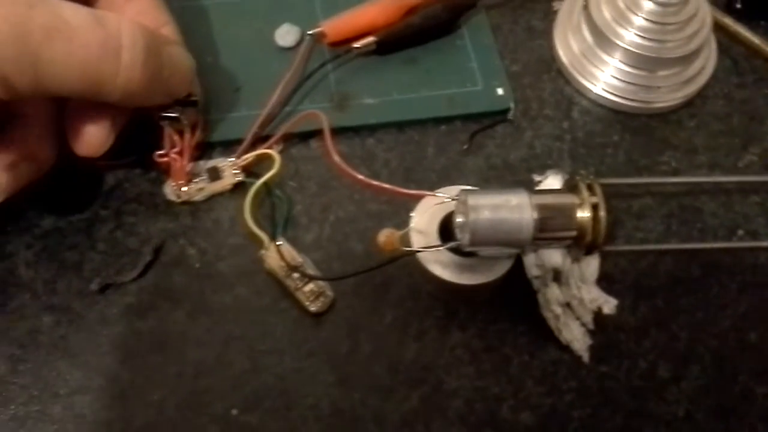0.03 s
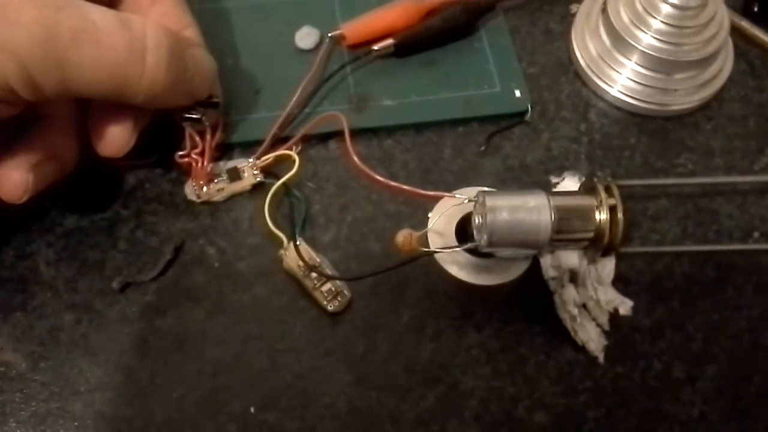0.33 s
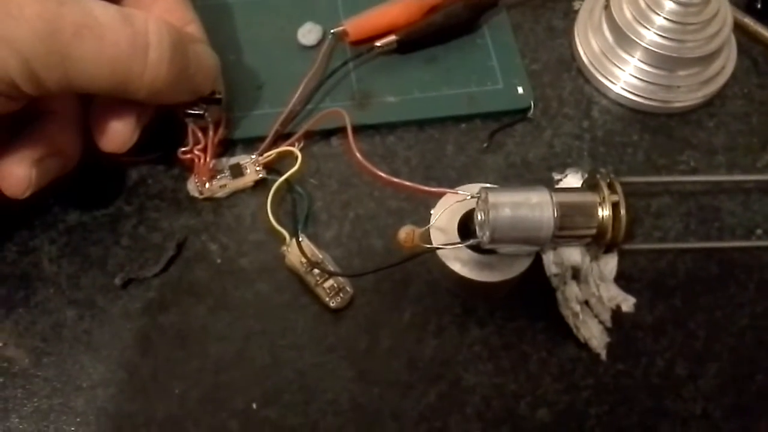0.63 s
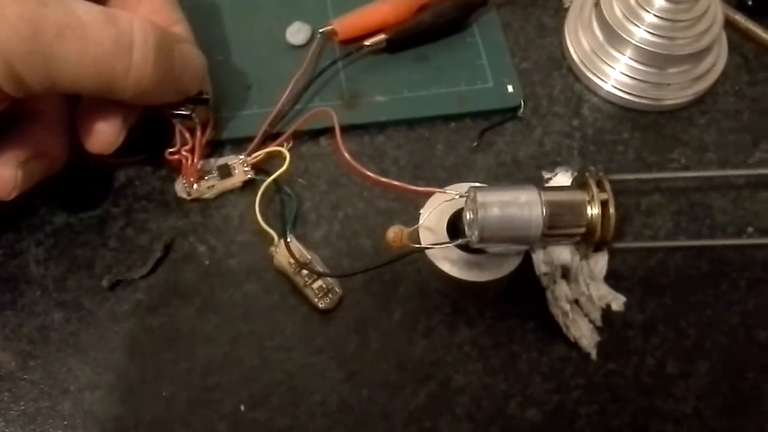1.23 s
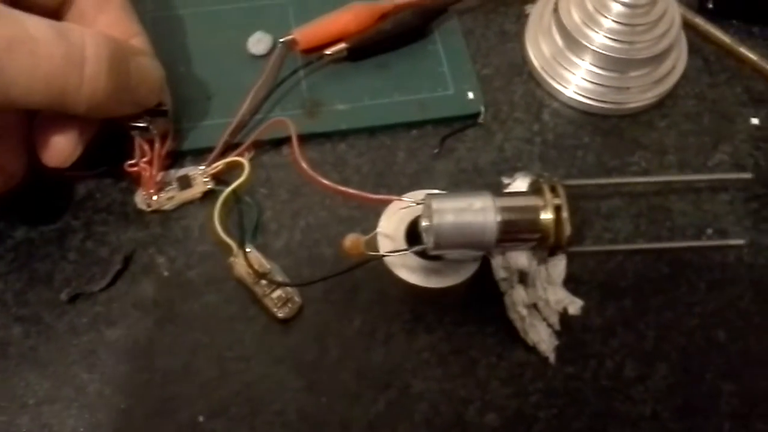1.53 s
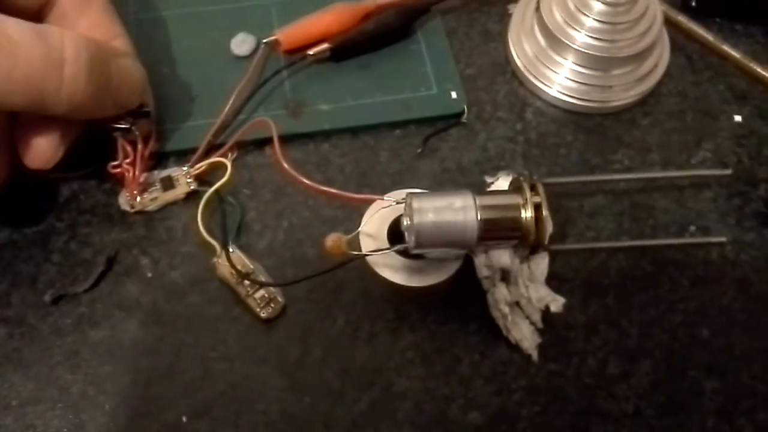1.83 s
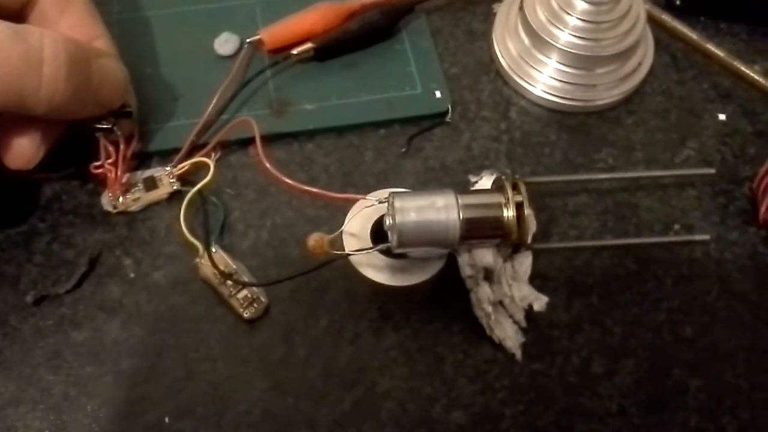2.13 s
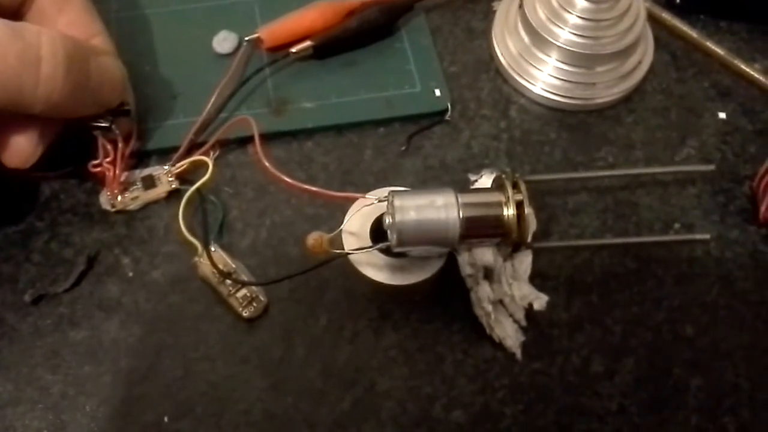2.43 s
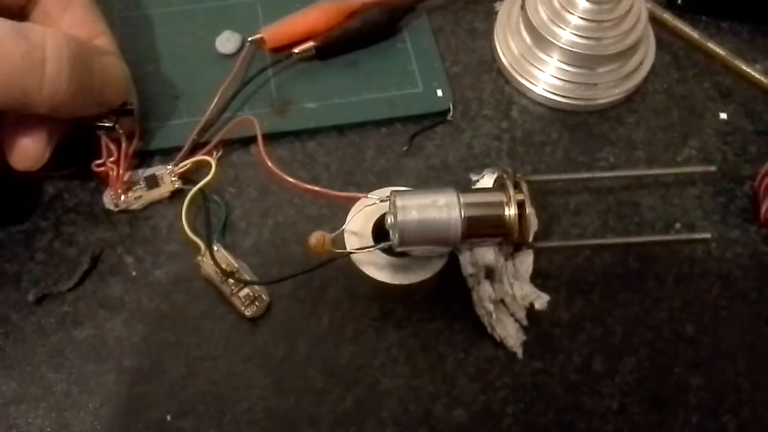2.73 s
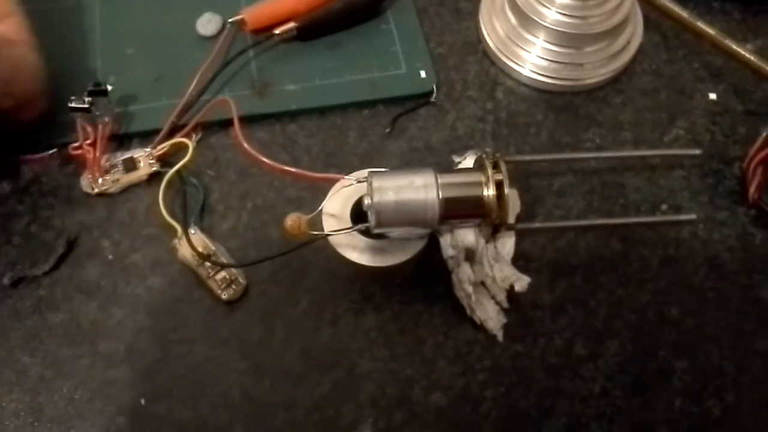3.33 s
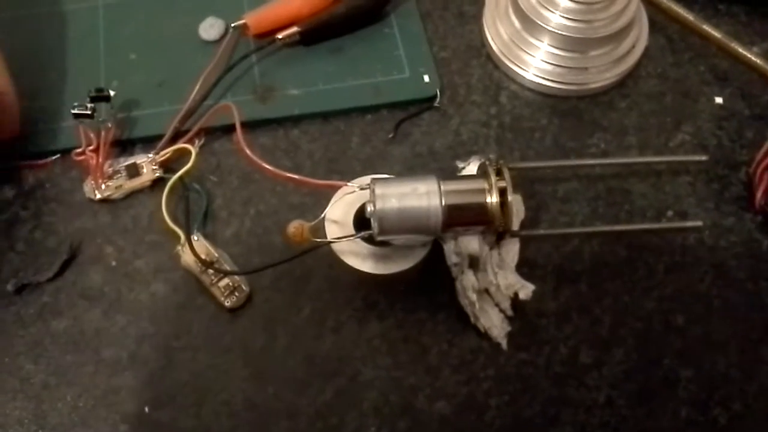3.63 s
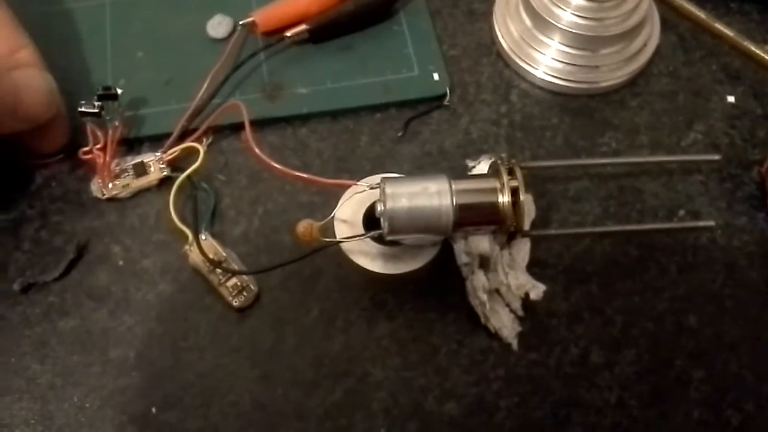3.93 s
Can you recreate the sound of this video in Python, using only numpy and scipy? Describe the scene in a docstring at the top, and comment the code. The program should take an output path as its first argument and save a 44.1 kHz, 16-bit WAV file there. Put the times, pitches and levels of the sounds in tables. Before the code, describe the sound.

Harsh, steady buzz of a little electric motor that suddenly cuts off into quiet hum.

```python
"""On a workbench, a small brushed DC motor buzzes at about 96 turns a second, its speed wavering.
The rotor radiates harmonics of its rotation rate; the brushes tick and scrape round the commutator
and drive the casing's resonances. Bench and room add short reflections. When the power is cut the shaft
brakes within a few hundredths of a second and the casing clatters, leaving a low hum and a fading hiss."""
import sys
import numpy as np
from scipy import signal
from scipy.fft import rfft, irfft, next_fast_len
from scipy.io import wavfile

SR = 44100
rng = np.random.default_rng(int(sys.argv[2]) if len(sys.argv) > 2 else 0)


def generate_wav(signal):
    """Clip the signal to [-1, 1] and save it as 16-bit WAV at the path in sys.argv[1]."""
    frames = np.transpose(np.atleast_2d(signal))
    scaled = np.clip(frames, -1, 1) * 32767
    pcm = np.round(scaled).astype(np.int16)
    wavfile.write(sys.argv[1], SR, pcm)


N = 176400
TIME = np.arange(N) / SR
POWER_OFF_S, BRAKE_S = 2.921, .075


def from_db(db):
    """Amplitude ratio of a level in decibels."""
    return 10 ** (np.asarray(db) / 20)


def envelope(rows):
    """Amplitude envelope, linear in decibels between (time [s], level [dB]) points."""
    return from_db(np.interp(TIME, *np.transpose(rows)))


def drift(corner_hz):
    """Slow random modulation: low-passed Gaussian noise of unit variance."""
    hop = 40
    pole = np.exp(-2 * np.pi * corner_hz * hop / SR)
    slow = signal.lfilter([1], [1, -2 * pole, pole * pole], rng.standard_normal(N // hop + 2002))[2000:]
    return np.interp(np.arange(N) / hop, np.arange(len(slow)), slow / slow.std())


def white():
    """White noise with a spectral density of 0 dB/Hz."""
    return rng.standard_normal(N) * np.sqrt(SR / 2)


def colour(x, points):
    """Zero-phase filtering by a curve of (frequency [Hz], gain [dB]) points."""
    hz, db = np.transpose(points)
    size = next_fast_len(N + SR)
    bin_hz = np.maximum(np.arange(size // 2 + 1) * SR / size, 1)
    gain = from_db(np.interp(np.log(bin_hz), np.log(hz), db))
    return irfft(rfft(x, size) * gain, size)[:N]


def resonance(x, hz, width_hz):
    """Forced response of one damped mode, with unit gain at its peak."""
    r = np.exp(-np.pi * width_hz / SR)
    feedback = [1, -2 * r * np.cos(2 * np.pi * hz / SR), r * r]
    return signal.lfilter(np.array([1, 0, -1]) * (1 - r * r) / 2, feedback, x)


# Spectrum of the room hiss: (frequency [Hz], gain [dB])
HISS_SPECTRUM = [(20, -88), (45, -110), (90, -83.5), (160, -83), (300, -86.5), (600, -92.5), (1000, -96),
                 (1600, -100), (2600, -104), (3600, -103), (4500, -100.5), (5500, -104), (9000, -105),
                 (14500, -104)]
# Envelope of the hiss: (time [s], level [dB])
HISS_ENVELOPE = [(0, -8.5), (2.9, -6), (2.99, 2.5), (3.1, -2.5), (3.3, -4), (3.5, -8.5), (3.8, -14),
                 (4, -16)]
# Envelope of the hum: (time [s], level [dB])
HUM_ENVELOPE = [(0, -79), (.6, -85), (1.1, -79), (2.92, -78), (3.02, -64.5), (3.5, -67), (4, -69.5)]


def background(hum_hz=64.4, waver=.13):
    """Broadband hiss and a hum modulated in phase and amplitude, both strongest as the motor stops."""
    phase = 2 * np.pi * hum_hz * TIME + waver * drift(3.5)
    hum = np.sqrt(2) * np.sin(phase) * (1 + waver * drift(2.4))
    hiss = colour(white(), HISS_SPECTRUM)
    return hiss * envelope(HISS_ENVELOPE) + hum * envelope(HUM_ENVELOPE)


def bench_reflections(x, gain_db=-14.5, t60_s=.15, delay_s=.003):
    """Reverberation: diffuse reflections from bench and room decay exponentially."""
    t = TIME[:SR // 2]
    response = rng.standard_normal(len(t)) * from_db(-60 * t / t60_s) * (t > delay_s)
    return from_db(gain_db) * signal.fftconvolve(x, response / np.linalg.norm(response))[:N]


# Bursts in the casing: (time [s], frequency [Hz], bandwidth [Hz], peak density [dB/Hz])
CLATTER_BURSTS = [(2.931, 1560, 420, -77), (2.942, 980, 180, -70.5), (2.935, 3900, 510, -89)]


def clatter(half_length_s=.018):
    """Transient excitation: noise bursts ring the casing's resonances as the shaft slows."""
    return sum(from_db(db) * resonance(white() * np.exp(-((TIME - s) / half_length_s) ** 2), hz, width)
               for s, hz, width, db in CLATTER_BURSTS)


# Modes of the casing: (frequency [Hz], bandwidth [Hz], gain [dB])
CASING_MODES = [(946, 49, 8), (1715, 47, 10.5), (2600, 36, 4), (5360, 100, 4.5), (8100, 340, 5.5)]


def casing(force):
    """Resonance: the casing reinforces the brush force near its natural frequencies."""
    return force + sum((from_db(db) - 1) * resonance(force, hz, width) for hz, width, db in CASING_MODES)


# Spectral weighting of the ticks: (frequency [Hz], gain [dB])
TICK_SPECTRUM = [(100, -18), (400, -16), (1000, -12), (2500, -12), (4300, -3), (8000, 0.5), (14000, -2)]


def ticks(turns, per_turn=48, spread_db=1.5, jitter_s=8e-6, flicker=.3):
    """Quasi-periodic impacts: the brushes meet the same rough spots each turn, never quite alike."""
    spots = rng.random(per_turn)
    strength = from_db(spread_db * rng.standard_normal(per_turn)) * rng.choice([-1, 1], per_turn)
    chance = rng.standard_normal((int(turns[-1]), per_turn, 2))
    hit_turns = np.arange(len(chance))[:, None] + spots
    hit_s = np.interp(hit_turns, turns, TIME) + jitter_s * chance[..., 0]
    sizes = strength * (1 + flicker * chance[..., 1])
    # Fourfold oversampling lets impacts fall between samples.
    slots = np.clip(hit_s * SR * 4, 0, 4 * N - 1).astype(int)
    impacts = signal.resample_poly(np.bincount(slots.ravel(), sizes.ravel(), 4 * N), 1, 4)
    impacts *= np.sqrt(SR / 2) / impacts[TIME < POWER_OFF_S].std()   # same power as white()
    return colour(impacts, TICK_SPECTRUM)


# Spectral weighting of the scrape: (frequency [Hz], gain [dB])
SCRAPE_SPECTRUM = [(100, 0), (500, 0), (1500, -0.5), (4000, -1.5), (8000, -0.5), (14000, -0.5)]


def scrape(turns, depth=.39, per_turn=4):
    """Sliding friction: noise, amplitude-modulated by the rotation."""
    pulsing = 1 + depth * np.cos(2 * np.pi * per_turn * turns)
    return colour(white() * pulsing, SCRAPE_SPECTRUM)


# Envelope of the brush force: (time [s], level [dB])
BRUSH_ENVELOPE = [(0, -0.5), (.6, -0.5), (1.0, -0.5), (1.3, 1), (1.7, 1.1), (2.1, -0.5), (2.6, 2.5),
                  (2.95, 1.5)]
# Weighting common to ticks and scrape: (frequency [Hz], gain [dB])
BRUSH_SPECTRUM = [(40, -101), (100, -99), (200, -87), (400, -86), (750, -86.5), (1100, -84), (1500, -83.5),
                  (1950, -90.5), (2500, -90.5), (3100, -94), (4200, -89.5), (5200, -94), (6400, -97),
                  (7400, -98.5), (8600, -98.5), (9800, -101), (10800, -94.5), (12300, -103), (13600, -99),
                  (14500, -102)]


def brushes(turns, speed_share):
    """Contact force: friction plus impacts, weakening as a power of the speed during braking."""
    force = (scrape(turns) + ticks(turns)) * envelope(BRUSH_ENVELOPE)
    return colour(force * speed_share ** .69, BRUSH_SPECTRUM)


# Harmonics that add in phase to four alternating jolts a turn: (order [cycles/turn])
JOLT_ORDERS = (6, 10, 14, 18, 22)


def harmonic(turns, order, waver, waver_hz=15.2):
    """A shaft harmonic of unit RMS, with random modulation in phase and in quadrature."""
    offset = rng.random() * (order not in JOLT_ORDERS)
    angle = 2 * np.pi * (order * turns + offset)
    wave = (1 + waver * drift(waver_hz)) * np.cos(angle) + waver * drift(waver_hz) * np.sin(angle)
    return wave * np.sqrt(2 / (1 + 2 * waver ** 2))


def rotor_tone(turns, speed, order, db, slope, racing_hz=96.3):
    """A harmonic whose level follows any speed above racing_hz; weak ones are modulated most deeply."""
    excess_hz = np.maximum(speed - racing_hz, 0)
    waver = min(from_db((-65 - db) / 2) / 2, .55)
    return from_db(db + slope * excess_hz) * harmonic(turns, order, waver)


def squeak(turns, speed, critical_hz=95.1, width_hz=.5):
    """Critical speed: one harmonic meets a casing mode when the shaft drags."""
    nearness = np.exp(-((speed - critical_hz) / width_hz) ** 2)
    return nearness * rotor_tone(turns, speed, order=40, db=-57.5, slope=0)


# Swells of the tenth harmonic: (centre time [s], duration [s], level [dB])
CHUG_SWELLS = [(0.102, .12, -45.5), (0.299, .06, -46.5), (0.393, .05, -47), (0.521, .07, -46.5),
               (0.707, 0.063, -47.5), (.80, .05, -48.5), (0.938, 0.046, -48.5), (1.11, 0.15, -48.5),
               (1.268, 0.098, -46), (1.37, 0.073, -43.5), (1.594, 0.081, -47), (1.776, 0.058, -47.5),
               (2.02, 0.054, -49), (2.17, 0.073, -49), (2.31, .04, -48), (2.394, .04, -49),
               (2.617, 0.064, -47.5)]


def chug(turns, floor_db=-53):
    """Amplitude modulation: the harmonic near 960 Hz swells about six times a second."""
    amplitude = from_db(floor_db)
    for centre_s, length_s, db in CHUG_SWELLS:
        swell = np.exp(-(2 * (TIME - centre_s) / length_s) ** 4 / 2)
        amplitude = np.maximum(amplitude, from_db(db) * swell)
    return amplitude * harmonic(turns, order=10, waver=.31)


# Partials of the whine, lowest first: (level [dB], slope with excess speed [dB/Hz])
WHINE_PARTIALS = [(-46.5, -10), (-56, -8), (-65.5, 0), (-70, -5)]
# Envelope of the whine: (time [s], level [dB])
WHINE_ENVELOPE = [(0.0, -1.3), (0.26, 0.1), (0.53, -1), (0.79, -0.7), (1.05, 1.2), (1.32, 1.4), (1.58, 1),
                  (1.85, -0.5), (2.11, 1), (2.37, 0), (2.64, -3), (2.9, -0.2)]


def whine(turns, speed, order=28):
    """A harmonic series on one high shaft order, dropping away when the shaft races."""
    partials = sum(rotor_tone(turns, speed, order * k, db, slope)
                   for k, (db, slope) in enumerate(WHINE_PARTIALS, 1))
    return partials * envelope(WHINE_ENVELOPE)


# Rotor harmonics: (order [cycles/turn], level [dB], slope with excess speed [dB/Hz])
BUZZ_HARMONICS = [(4, -68.8, 0), (5, -69.9, 0), (6, -49.2, 0), (7, -72.0, 0), (8, -69.0, 0),
                  (9, -65.3, -10), (11, -66.0, 0), (12, -62.3, 5), (13, -65.7, 8), (14, -58.2, 8),
                  (15, -58.9, 4), (17, -66.5, -6), (18, -46.0, -6), (20, -64.8, 6), (22, -61.1, 7),
                  (24, -63.4, -10), (26, -71.3, -1), (30, -59.5, -12), (34, -71.8, 4), (36, -70.5, 6),
                  (37, -74.0, 0), (38, -69.3, -12), (39, -74.0, 0), (40, -70.9, 8), (42, -64.9, 3),
                  (43, -67.2, -6), (44, -67.8, -10), (46, -61.5, -4), (47, -72.0, 0), (48, -72.7, 7),
                  (50, -67.6, 7), (54, -76.0, 0), (58, -77.4, 8), (62, -69.0, -8), (72, -70.2, -12),
                  (86, -72.3, 8)]
# Envelope of the buzz: (time [s], level [dB])
BUZZ_ENVELOPE = [(0.0, -0.5), (0.26, -1), (0.53, -1), (0.79, -0.2), (1.05, 2), (1.32, 3.0), (1.58, 0.4),
                 (1.85, 0), (2.11, -0.5), (2.37, 0.3), (2.64, 1), (2.9, -0.5)]


def rotor(turns, speed, fade_db_per_s=900):
    """Periodic forcing: tones at multiples of the rotation rate, dying away once the power is cut."""
    buzz = sum(rotor_tone(turns, speed, *row) for row in BUZZ_HARMONICS) * envelope(BUZZ_ENVELOPE)
    fade = from_db(-fade_db_per_s * np.maximum(TIME - POWER_OFF_S, 0))
    return (buzz + whine(turns, speed) + squeak(turns, speed) + chug(turns)) * fade


# Shaft speed before flutter and braking: (time [s], rotation rate [Hz])
SHAFT_SPEED = [(0.0, 96.46), (0.09, 94.93), (0.17, 96.31), (0.29, 95.31), (0.34, 95.99), (0.39, 95.41),
               (0.45, 96.4), (0.51, 95.39), (0.6, 96.63), (0.69, 95.16), (0.83, 96.44), (0.93, 95.53),
               (1.03, 96.61), (1.14, 96.0), (1.29, 96.94), (1.36, 95.23), (1.45, 96.63), (1.59, 95.73),
               (1.72, 97.31), (1.8, 96.04), (1.97, 97.02), (2.01, 96.57), (2.1, 97.21), (2.21, 95.84),
               (2.28, 97.02), (2.43, 95.99), (2.52, 97.07), (2.62, 95.54), (2.78, 96.92), (2.89, 96.05)]


def shaft(speed_share, flutter=.0012, jump_s=2.02):
    """Rotation is the integral of speed; returns the angle [turns] and the smooth, unbraked speed [Hz]."""
    times, rates = np.transpose(SHAFT_SPEED)
    rows = np.arange(len(times))
    position = np.interp(TIME, times, rows)
    eased = np.floor(position) + (1 - np.cos(np.pi * (position % 1))) / 2
    speed = np.interp(eased, rows, rates)
    jump = .0445 * np.exp(-((TIME - jump_s) / .006) ** 2)   # the shaft races for an instant
    unsteady = flutter * drift(20.8) + jump
    return np.cumsum(speed * speed_share * (1 + unsteady)) / SR, speed


def scene():
    """Superposition: rotor tones and brush noise from one shaft, their reflections and the background."""
    speed_share = np.clip(1 - (TIME - POWER_OFF_S) / BRAKE_S, 0, 1)   # uniform deceleration
    turns, speed = shaft(speed_share)
    tones = rotor(turns, speed)
    rattle = casing(brushes(turns, speed_share)) + clatter()
    reflections = bench_reflections(from_db(-16.5) * tones + rattle)
    return (tones + rattle + reflections + background())[None]


def record(dry):
    """Band limiting: a steep elliptic low-pass at 14650 Hz."""
    return signal.sosfilt(signal.ellip(12, .1, 70, 14650, fs=SR, output="sos"), dry)


dry = scene()
out = record(dry)
generate_wav(out)
```